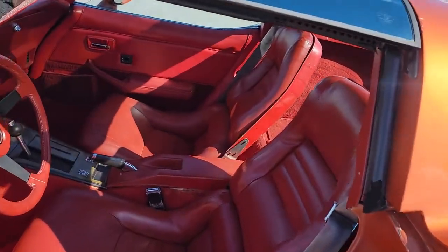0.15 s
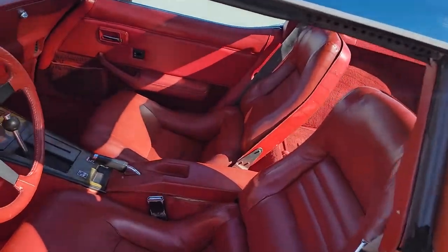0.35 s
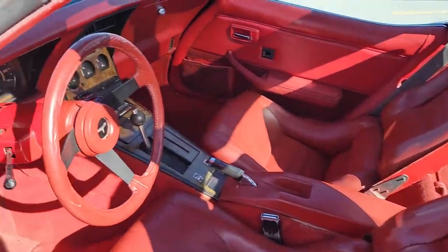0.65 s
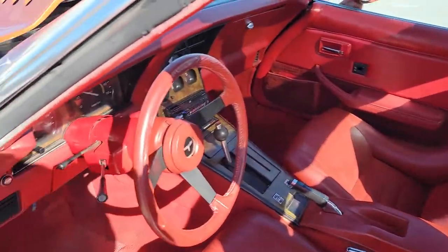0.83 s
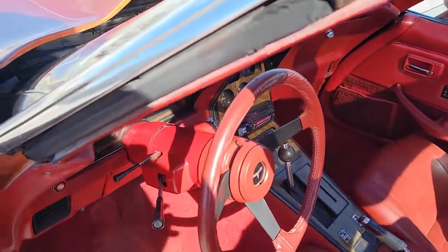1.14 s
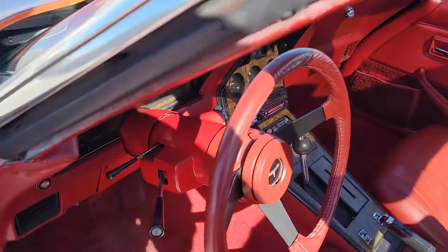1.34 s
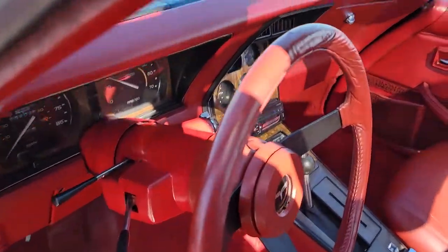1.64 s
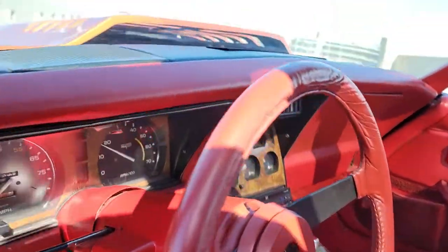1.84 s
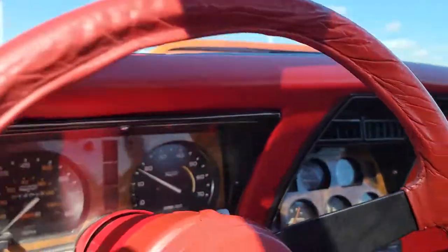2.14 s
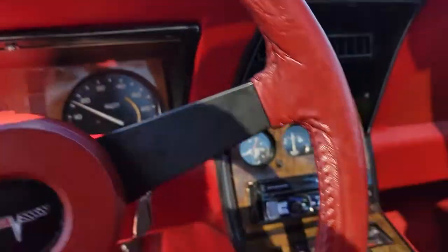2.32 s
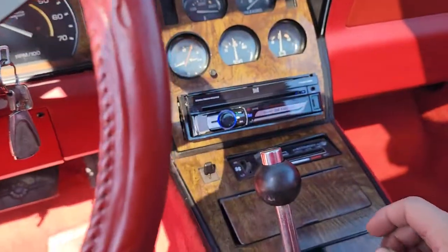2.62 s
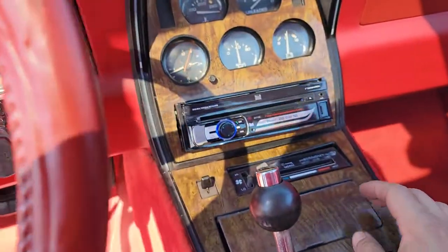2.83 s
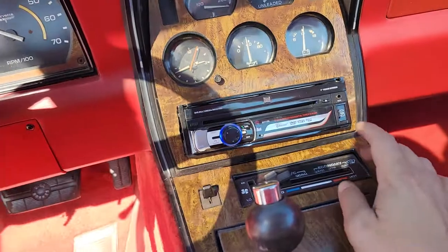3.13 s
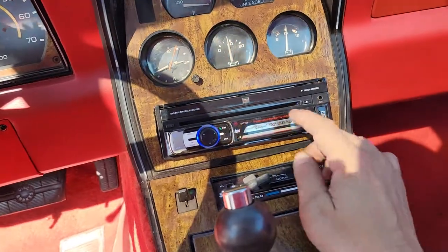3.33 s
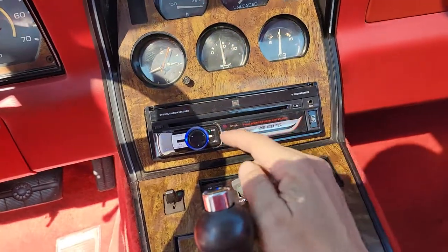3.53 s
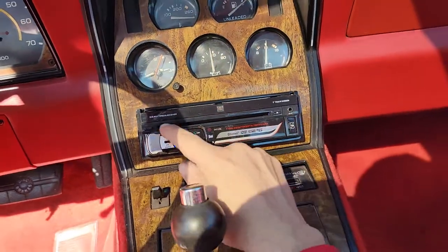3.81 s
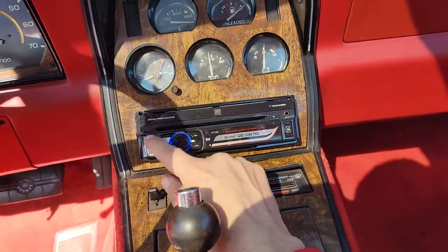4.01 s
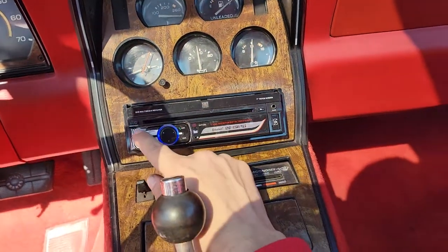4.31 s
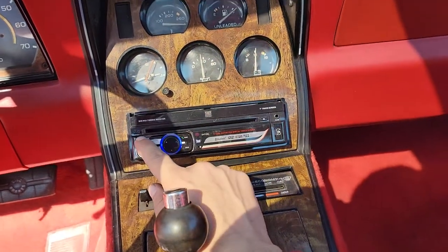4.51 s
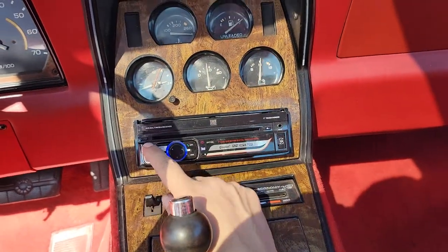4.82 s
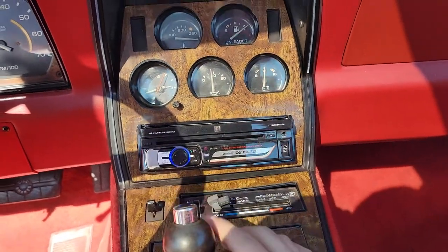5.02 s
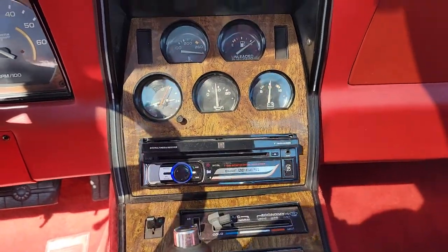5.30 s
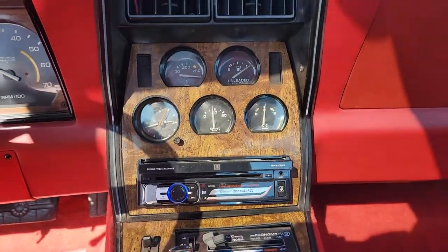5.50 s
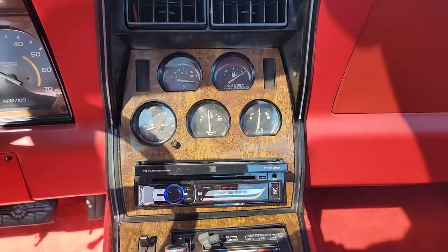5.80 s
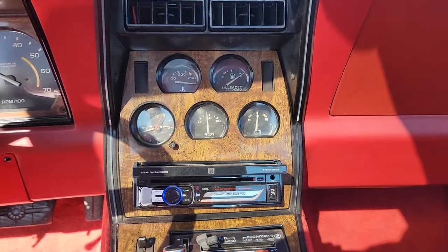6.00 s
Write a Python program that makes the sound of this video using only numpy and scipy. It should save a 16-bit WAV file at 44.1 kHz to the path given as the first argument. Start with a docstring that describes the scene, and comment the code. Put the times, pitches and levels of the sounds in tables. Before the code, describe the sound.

A big petrol V8 idles throughout, about 58 uneven firings a second, with slight dips in speed. From 0 to 0.8 s the handheld stereo microphone is beside the open door: airy engine-bay roar, valve clatter and a faint wavering whine over low exhaust. At 0.9-1.0 s a cluster of dull padding thumps sounds with a small frame knock; more thumps come near 1.4 s. Around 1.5-1.6 s another thump brings a quick run of sharp leather snaps on the left, a breathy squeak and tiny plastic ticks. Softer thumps and a light leather slide follow at 2.0-2.15 s as the microphone enters the cabin. The clatter drops behind bodywork, and from 2.4 s a deep, throbbing boom dominates. Faint ticks come at 4.6 and 4.8 s, a slight knock near 4.9 s, with soft rubbing around 4.9 s and a brighter short brush at 5.3 s. The idle continues to the end at about 6 s.

```python
"""A big petrol V8 idles: uneven firings ring the exhaust pipe and boom in the cabin.
The hand-held microphones move from beside the open door into the cabin, and the engine bay's roar,
clatter and whine fall behind the bodywork. Someone settles into the leather seat: padding thumps, the frame
knocks, leather snaps and squeaks. Small plastic parts tick; cloth and fingers rub close to the microphones."""
import sys
import numpy as np
from scipy import signal
from scipy.fft import rfft, irfft, next_fast_len
from scipy.io import wavfile
from scipy.ndimage import uniform_filter1d, map_coordinates

SR = 44100
rng = np.random.default_rng(int(sys.argv[2]) if len(sys.argv) > 2 else 0)


def inscribe(sig):
    """Save sig as 16-bit PCM at rate SR to the path in sys.argv[1].

    A 1-D sig is mono; a 2-D sig holds one channel per row.
    Samples are clipped to [-1, 1] before scaling.
    """
    pcm = np.round(np.clip(np.atleast_2d(sig).T, -1, 1) * 32767)
    wavfile.write(sys.argv[1], SR, pcm.astype(np.int16))


N = 271215

# moving away from the engine bay and the open air: (t/s, bay gain/dB, hiss level/dB, whine level/dB)
BAY_AND_AIR = [(0, 1.5, -50, -45), (.45, 2.5, -54, -50), (.8, -0.5, -52, -42), (1.05, -2.5, -53.5, -49),
               (1.35, -6.5, -53, -71), (1.7, -9, -59, -53), (2.3, -10, -65, -73), (2.8, -12, -78, -57.5),
               (3.75, -13.5, -71, -59), (4.4, -13, -71, -55), (5.3, -11.5, -67.5, -55),
               (6.15, -12.5, -66, -57)]


def amp(db):
    """Amplitude ratio of a level in dB."""
    return 10 ** (np.asarray(db) / 20)


def unit(x):
    """x scaled to rms 1."""
    return x / np.sqrt(np.mean(x ** 2) + 1e-20)


def along(points, hz):
    """Interpolate (f/Hz, value) points on a log frequency axis."""
    f, v = np.transpose(points)
    return np.interp(np.log(hz + 1), np.log(f + 1), v)


def curves(rows):
    """One value per sample for each column after the time."""
    s, *cols = np.transpose(rows)
    return [np.interp(np.arange(N) / SR, s, c) for c in cols]


def wobble(rate):
    """A smooth random curve, rate knots a second."""
    return map_coordinates(rng.standard_normal(int(N * rate / SR) + 4), [np.arange(N) * rate / SR])


def filtered(x, response):
    """x through a complex response of frequency, padded so that tails do not wrap round."""
    m = next_fast_len(N + SR // 2)
    return irfft(rfft(x, m) * response(np.fft.rfftfreq(m, 1 / SR)), m)[..., :N]


def resonant(modes):
    """Causal response of (f/Hz, width/Hz, level/dB) modes with alternating signs."""
    def response(f):
        total = 0
        for k, (centre, width, db) in enumerate(modes):
            mode = 1j * f * width / (centre * centre - f * f + 1j * f * width)
            total = total + (-1) ** k * amp(db) * mode
        return total
    return response


def resonant_noise(modes, channels=2):
    """Independent noise in each channel, passed twice through the modes; rms 1."""
    noise = rng.standard_normal((channels, N))
    return unit(filtered(noise, lambda hz: resonant(modes)(hz) ** 2))


def panned(x, db):
    """Left and right, db apart."""
    return np.array([x * amp(db / 2), x * amp(-db / 2)])


def lagged(x, radians):
    """x with all its frequencies turned back by the same phase."""
    analytic = signal.hilbert(x, next_fast_len(len(x)))[:len(x)]
    return np.real(analytic * np.exp(-1j * radians))


def add_at(out, s, sound):
    """Add a mono or stereo sound to out, starting at s seconds."""
    start = round(s * SR)
    out[:, start:start + sound.shape[-1]] += sound


def strokes(rows):
    """Gain of (start/s, rise/s, hold/s, fall/s, level/dB) strokes; all but silent outside them."""
    edge_db = 20.5  # a stroke rises and falls through this much
    t = np.arange(N) / SR
    gain = np.zeros(N)
    for s, *lengths, db in rows:
        knots = np.cumsum([s, *lengths])
        gain += amp(db - np.interp(t, knots, [edge_db, 0, 0, edge_db], 200, 200))
    return gain


def burst(hz, t60, rough, length=0.13, sag=0):
    """A short ring at hz whose pitch wavers and may start sharp by the share sag; peak 1."""
    sag_s = .004
    t = np.arange(int(length * SR)) / SR
    wander = np.cumsum(uniform_filter1d(rng.standard_normal(len(t)), size=int(SR / hz / 2))) * rough
    turns = hz * (t + sag * sag_s * (1 - np.exp(-t / sag_s)))
    attack = 1 - np.exp(-t * hz * 2.1)
    ring = np.sin(2 * np.pi * turns + wander) * amp(-60 * t / t60) * attack
    return ring / np.abs(ring).max()


def inside():
    """Cross-fade angle: 0 beside the car, a quarter turn in the cabin."""
    # the microphones pass from the open air into the cabin: (start t/s, end t/s)
    passage = (1.85, 2.21)
    return np.interp(np.arange(N) / SR, passage, [0, np.pi / 2])


def rush(mid, side, side_db, patchy_db, lead=0):
    """Stereo noise with patches of random gain; its mid has rms 1; lead ties the side to a phase-shifted mid."""
    z = signal.stft(rng.standard_normal((2, N)), nperseg=512)[2]
    loose = signal.stft(rng.standard_normal(N), nperseg=512)[2]
    patches = uniform_filter1d(rng.standard_normal(z.shape[1:]), size=6, axis=0)
    patches = uniform_filter1d(patches, size=10, axis=1)
    z[1] = 1j * lead * z[0] + np.sqrt(1 - min(lead ** 2, 1)) * z[1]
    # the cabin ties the ports closer
    frame_starts = np.minimum(np.arange(z.shape[2]) * 256, N - 1)
    near = np.maximum(inside(), .8)[frame_starts]
    z[1] = np.cos(near) * loose + np.sin(near) * z[1]
    pair = signal.istft(z * amp(patchy_db * unit(patches)), nperseg=512)[1][:, :N]
    m, s = filtered(pair, lambda hz: amp([along(mid, hz), along(side, hz)]))
    return unit(m) + amp(side_db) * unit(s) * np.array([[1], [-1]])


def firings(scatter_db, jitter_ms):
    """One impulse per firing: each cylinder has its strength and lateness, and no burn is like the last."""
    # idle speed: (t/s, firings a second f/Hz)
    firing_rate = [(0, 60), (.42, 59.3), (.7, 57.8), (1.16, 58.7), (2.02, 59.2), (2.25, 56.8), (2.42, 57.7),
                   (2.7, 57.2), (2.9, 56), (3.28, 58.9), (3.45, 57), (3.72, 55.9), (4.02, 56.2),
                   (4.3, 58.2), (4.78, 58.2), (5, 56.3), (5.3, 58.2), (5.85, 57.4), (6.15, 58.8)]
    # the eight cylinders in firing order: (strength level/dB, lateness from its manifold path/ms)
    cylinders = [(-1, -.1), (1.8, .2), (.4, .4), (1, 1.7), (-.7, -2.1), (-2.7, 1), (2, -.6), (-.9, -.5)]
    turns = np.cumsum(curves(firing_rate)[0]) / SR
    k = np.arange(int(turns[-1]))
    strength_db, late_ms = np.array(cylinders)[(k + 1) % 8].T
    timing_luck, burn_luck = rng.standard_normal((2, len(k)))
    burn_luck = burn_luck - .7 * np.roll(burn_luck, 1)  # a weak burn leaves charge for the next
    at = np.interp(k + .2, turns, np.arange(N))
    at += (late_ms + jitter_ms * timing_luck) * SR / 1000
    return np.bincount(np.clip(at, 0, N - 1).astype(int), amp(strength_db + scatter_db * burn_luck), N)


def exhaust(pulses):
    """The firings ring the cabin boom and the pipe; the silencer eats their sharp edges."""
    # cabin and silencer resonances near the firing rate: (f/Hz, width/Hz, level/dB)
    boom_modes = [(57.8, 15.6, 0), (42, 12, -9)]
    # pipe as heard in the cabin: (f/Hz, width/Hz, level/dB)
    cabin_pipe = [(87, 20, 0), (152, 5, -7)]
    # pipe as heard beside the car: (f/Hz, width/Hz, level/dB)
    street_pipe = [(73, 12, 0), (95, 12, -5), (136, 24, -6)]
    # the body shakes loosely around the boom: (f/Hz, width/Hz, level/dB)
    shake_modes = [(24, 14, -5), (43, 12, -1), (68, 14, 0)]
    # past the door frame, then deep into the booming cabin: (t/s, boom level/dB, pipe level/dB)
    approach = [(0, -14, -23), (.45, -17.5, -13.5), (.65, -20.5, -23.5), (1.15, -27, -22.5),
                (1.35, -24.5, -27.5), (1.65, -34, -29.5), (1.95, -18, -20.5), (2.45, -14, -16.5),
                (2.9, -10, -15.5), (3.2, -13, -15), (3.75, -9.5, -16.5), (4.5, -10, -16),
                (5.15, -9.5, -17.5), (5.55, -14.5, -13.5), (6.15, -11.5, -16.5)]
    # the microphones turn: (t/s, bass left-right level/dB)
    turning = [(2.0, 0.5), (2.6, -4), (6.1, -2.5)]
    shake_db, shake_share = -23, .5  # level at the strongest boom; how closely it follows the boom
    bass_lead = 0.39  # radians by which the left port leads inside the cabin

    boom_db, pipe_db = curves(approach)
    muffled = filtered(pulses, lambda hz: 1 / (1 + (hz / 116) ** 4))
    muffled -= .7 * filtered(muffled, resonant([(116, 14, 0)]))  # a side chamber traps twice the firing rate
    boom = unit(filtered(muffled, resonant(boom_modes)))
    cabin = unit(filtered(muffled, resonant(cabin_pipe)))
    street = unit(filtered(muffled, resonant(street_pipe)))
    pipe = np.sin(inside()) * cabin + np.cos(inside()) * street
    shake = resonant_noise(shake_modes, channels=1)[0]
    loose = amp(shake_db + shake_share * (boom_db - boom_db.max())) * shake
    bass = amp(boom_db) * boom - amp(pipe_db) * pipe + loose
    left, right = panned(bass, curves(turning)[0])
    return np.array([left, lagged(right, bass_lead * np.sin(inside()))])


def engine_bay(pulses):
    """Air roar and valve clatter pumped a little by the firings, humming panels and a faint wavering whine."""
    # air roar, a mid and a side list: (f/Hz, density level/dB per Hz)
    roar_tone = [(94, -17), (160, -3), (263, -11), (367, -11), (505, -15), (600, -24), (808, -28),
                 (900, -46), (1170, -61), (1980, -120)], [(59, -29), (100, -3.5), (141, -23), (307, -23.5),
                 (372, -21.5), (715, -20.5), (900, -25.5), (1170, -58.5), (1980, -120)]
    # valve clatter, a mid and a side list: (f/Hz, density level/dB per Hz)
    clatter_tone = [(350, -4.5), (600, 1), (918, -2), (1200, -2.5), (1400, -5.5), (2030, -4.5), (3330, -17),
                    (7070, -26), (8220, -39), (15900, -45.5)], [(350, -39), (600, -27), (996, -9.5),
                    (1750, -17), (2030, -20), (2640, -24.5), (2860, -26.5), (7370, -43), (8330, -50.5),
                    (15900, -70)]
    # a belt-driven pump: (f/Hz, width/Hz, level/dB)
    pump_modes = [(2030, 70, 0), (1800, 100, -4)]
    # body panels hum with the engine: (f/Hz, width/Hz, level/dB)
    panel_modes = [(202, 14, -1), (368, 30, 0), (510, 34, -5)]
    roar_db, roar_share = -31.5, 0.14  # before bay gain; share of it felt, as bass passes the bodywork
    clatter_db, dull_db, dull_share = -34, -38, 0.65  # above and below the split; share of bay gain below
    split_hz = 1900

    gain_db, _, whine_db = curves(BAY_AND_AIR)
    puffs = np.abs(uniform_filter1d(uniform_filter1d(pulses, size=600), size=500))
    pumping = (puffs / puffs.mean()) ** 0.22
    roar = unit(rush(*roar_tone, side_db=0.7, patchy_db=1.76, lead=0.7) * pumping)  # left port hears it first
    roar *= amp(roar_db + roar_share * gain_db + 1.6 * wobble(7.7))
    # the clatter reaches the ports nearly in opposite phase
    clatter = rush(*clatter_tone, side_db=1.5, patchy_db=1.7, lead=-.6)
    clatter *= pumping * amp(.5 * wobble(4.9))
    low = filtered(clatter, lambda hz: 1 / (1 + (hz / split_hz) ** 4))
    bright = amp(clatter_db + gain_db) * (clatter - low)
    dull = amp(dull_db + dull_share * gain_db) * low
    whine = amp(whine_db + 3 * wobble(11)) * resonant_noise(pump_modes)
    panels = amp(-45.5 + 3.2 * wobble(6.8)) * resonant_noise(panel_modes)
    return roar + bright + dull + panels + whine


def thump(hz):
    """Padding gives a dull ring with a short, gritty overtone; both start sharp and settle as it gives."""
    sag = .3
    ring = burst(hz, t60=.014 + 11 / hz, rough=.035, sag=sag)  # low thumps ring longer
    return ring + amp(-10.5) * burst(1.75 * hz, t60=0.035, rough=0.076, sag=sag)


def seat_thumps():
    """The padding thumps dully, reaching the two ports at different phases, and the seat frame knocks."""
    # padding: (t/s, level/dB, f/Hz, left-right level/dB, radians by which the left port leads)
    thump_rows = [(0.894, -17.5, 200, -5, -0.5), (0.908, -16.5, 225, -4.5, -2),
                  (0.940, -13.5, 290, 5.5, -2.5), (0.958, -13, 380, -6, -2), (0.984, -16, 605, -7.5, -2.5),
                  (0.993, -16, 473, 2, -2), (1.355, -18.5, 310, 4, -1.1), (1.375, -22.5, 392, 3, -1),
                  (1.385, -11.5, 294, -5, -1.6), (1.399, -15.5, 212, -1, 0.6), (1.564, -11.5, 310, 1.5, 2),
                  (1.584, -18.5, 265, 0, 1.7), (2.011, -26, 394, 1, 0.7), (2.066, -13.5, 485, -4.5, 1.7),
                  (2.103, -22.5, 430, -6.5, -0.7), (2.139, -23.5, 348, 2, 2.8)]
    # frame: (t/s, level/dB, f/Hz)
    knock_rows = [(0.908, -24, 1130), (0.958, -31, 970), (1.375, -31.5, 933), (4.865, -33.5, 900)]
    out = np.zeros((2, N + SR))
    for s, db, hz, pan_db, lead in thump_rows:
        shared = thump(hz)
        both = np.array([shared, lagged(shared, lead) + .3 * thump(hz)])
        add_at(out, s, amp([[db + pan_db / 2], [db - pan_db / 2]]) * both)
    for s, db, hz in knock_rows:
        add_at(out, s, amp(db) * burst(hz, t60=0.031, rough=0.055))
    return out[:, :N]


def padding_scuffle():
    """Lumpy noise through the dull padding modes, as the padding shifts under a weight."""
    # shifts: (start t/s, rise/s, hold/s, fall/s, level/dB)
    shifts = [(.85, 0.045, 0.1, .08, -34), (1.3, 0.066, 0.06, 0.2, -32), (1.52, 0.05, 0.035, 0.3, -32),
              (1.98, 0.077, 0.1, 0.3, -34)]
    # padding resonances: (f/Hz, width/Hz, level/dB)
    padding_modes = [(317, 280, 0), (737, 740, -4)]
    lumps = rng.standard_normal((2, N)) * amp(1.2 * wobble(45))
    return strokes(shifts) * unit(filtered(lumps, lambda hz: resonant(padding_modes)(hz) ** 2))


def leather():
    """Stretched leather snaps and scuffs through its own resonances, and squeaks where it slides taut."""
    # leather resonances: (f/Hz, width/Hz, level/dB)
    leather_modes = [(1215, 480, -3.5), (1930, 500, 0), (2720, 280, -2), (3450, 410, -6), (6500, 6600, -6)]
    # snaps: (t/s, level/dB)
    snap_rows = [(1.5204, -21), (1.537, -14), (1.5533, -13), (1.5595, -15), (1.5647, -8), (1.5682, -14),
                 (1.5786, -12), (1.584, -16), (1.598, -9), (1.6098, -11), (1.619, -22)]
    # leather sliding: (start t/s, rise/s, hold/s, fall/s, level/dB)
    slides = [(1.49, 0.064, 0.049, 0.09, -29), (1.99, 0.045, .09, 0.19, -40)]
    # taut leather hisses at one pitch: (start t/s, rise/s, hold/s, fall/s, level/dB, f/Hz)
    squeak_rows = [(1.53, 0.053, 0.03, 0.051, -28, 2260), (2.026, 0.008, 0.06, 0.049, -38, 2930),
                   (2.03, 0.032, 0.023, 0.21, -37, 1990)]
    top_hz = 3300  # padding soaks up the treble

    def skin(hz):
        return resonant(leather_modes)(hz) / (1 + 1j * hz / top_hz) ** 4

    def snap(hz):
        return skin(hz) - .25 / (1 + 1j * hz / top_hz) ** 3  # the ring and the sharp pull

    slips = np.zeros(N)
    for s, db in snap_rows:
        slips[round(s * SR)] = amp(db)
    single_peak = np.abs(filtered(np.arange(N) == 0, snap)).max()
    out = panned(filtered(slips, snap), 12) / single_peak  # the seat is on the left
    out[1] = np.roll(out[1], 14)  # samples later on the right
    grit = rng.standard_normal((2, N)) * amp(1.3 * wobble(400))
    out += amp([[1.5], [-1.5]]) * strokes(slides) * unit(filtered(grit, skin))
    for *stroke, hz in squeak_rows:
        out += strokes([stroke]) * resonant_noise([(hz, 700, 0)])
    return out


def ticks():
    """Small plastic parts: a brief ring over a sharp edge of noise."""
    # plastic: (t/s, level/dB, f/Hz, sharp edge over the ring level/dB)
    tick_rows = [(0.864, -36, 3030, 4.5), (1.517, -32.5, 2990, -13), (1.553, -28, 3450, 1),
                 (1.771, -38, 3220, -10.5), (1.9686, -34, 2760, -1), (2.192, -37.5, 2830, -8),
                 (4.601, -41.5, 3200, 5.5), (4.78, -44, 3360, -28)]
    out = np.zeros((2, N + SR))
    t = np.arange(SR // 20) / SR
    for s, db, hz, edge_db in tick_rows:
        edge = amp(edge_db - 60 * t / 0.023) * rng.standard_normal((2, len(t)))
        ring = burst(hz, t60=0.051, rough=0.35, length=.06)[:len(t)]
        add_at(out, s, amp(db) * (ring + edge))
    return out[:, :N]


def rubbing():
    """Fine hiss: open air throughout, and strokes of cloth and skin near the ports, brighter when pressed hard."""
    # hiss of cloth and air: (f/Hz, density level/dB per Hz)
    cloth_tone = [(1470, -35), (2500, -5), (2700, 0.5), (4530, -8), (6560, 3.5), (8330, -7.5),
                  (10900, -9.5), (15100, -5), (15800, -8)]
    # cloth and finger strokes: (start t/s, rise/s, hold/s, fall/s, level/dB)
    rubs = [(1.49, 0.042, 0.049, 0.072, -52), (2.04, 0.03, 0.063, 0.062, -54),
            (2.17, 0.018, 0.011, .07, -51.5), (2.7, 0.33, .5, 0.033, -58), (3.68, .09, 0.023, 0.18, -59.5),
            (4.8, 0.077, 0.067, 0.44, -49.5), (5.04, 0.018, 0.022, 0.068, -61),
            (5.28, 0.0064, 0.058, 0.046, -43.5), (5.38, 0.077, .03, 0.091, -61.5)]
    pressure = strokes(rubs)
    hiss = rush(cloth_tone, cloth_tone, side_db=0.5, patchy_db=1.0)
    hiss *= amp(1.3 * wobble(330) + 0.37 * wobble(33))
    sheen = filtered(hiss, lambda hz: 1 / (1 + (11500 / (hz + 1)) ** 8))
    level = amp(curves(BAY_AND_AIR)[1]) + pressure
    return level * (hiss + np.clip(pressure / amp(-50.5), 0, 1.5) * sheen)


def scene():
    """One train of firings drives the exhaust and the engine bay; the seat, ticks and rubbing join them."""
    pulses = firings(scatter_db=1.9, jitter_ms=.6)
    engine = exhaust(pulses) + engine_bay(pulses)
    seat = seat_thumps() + padding_scuffle() + leather()
    return engine + seat + ticks() + rubbing()


def record(dry):
    """The microphones lose the deepest bass and round off the peaks; nothing passes above the band limit."""
    ceiling, top_hz = .97, 15950  # the loudest booms round off under the ceiling
    heard = filtered(dry, lambda hz: (1j * hz / (12 + 1j * hz)) ** 4)
    heard = heard / (1 + np.abs(heard / ceiling) ** 8) ** (1 / 8)
    return filtered(heard, lambda hz: hz < top_hz)


dry = scene()
out = record(dry)
inscribe(out)
```